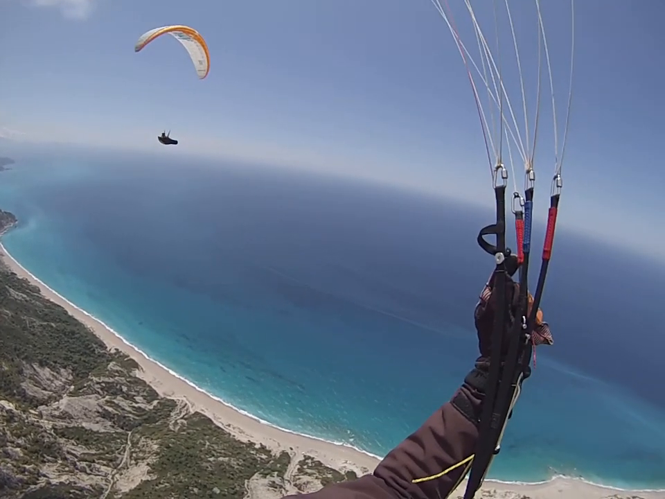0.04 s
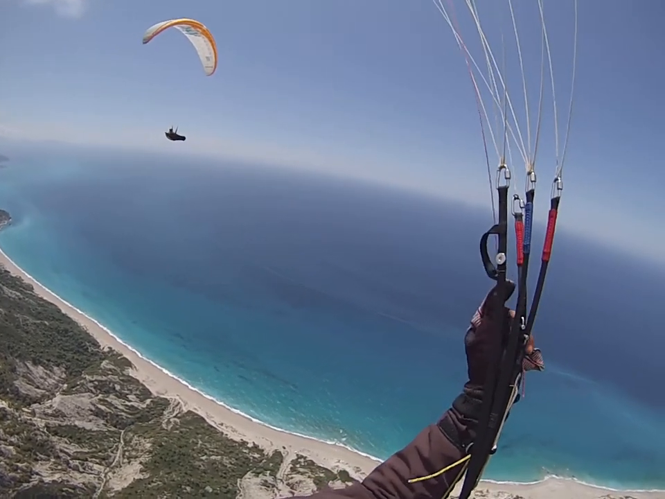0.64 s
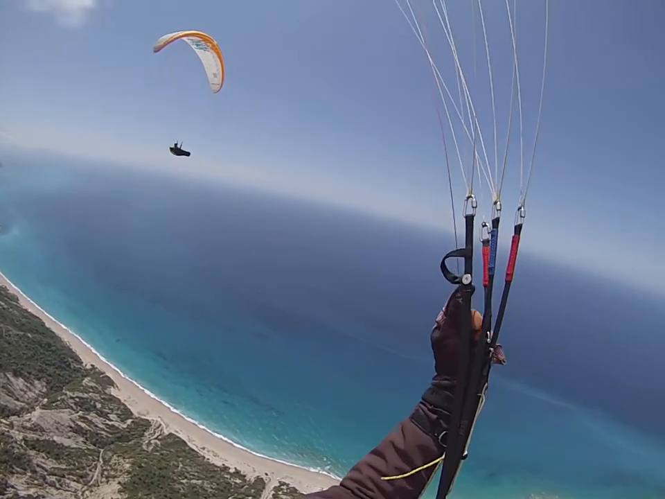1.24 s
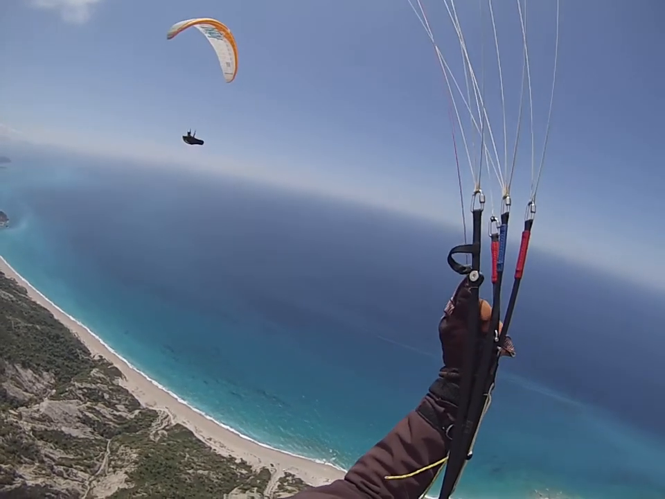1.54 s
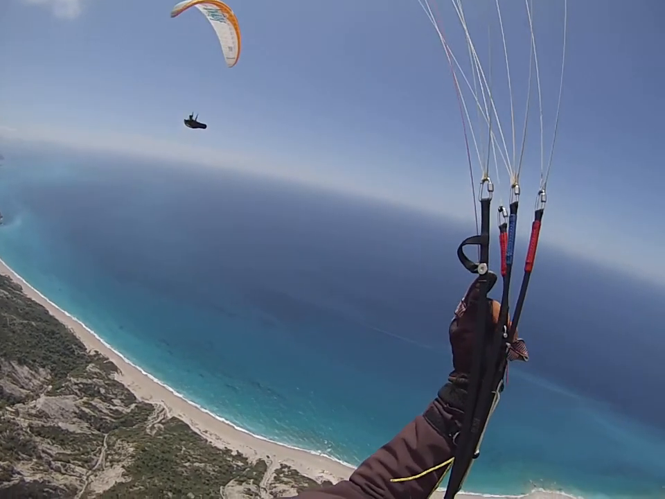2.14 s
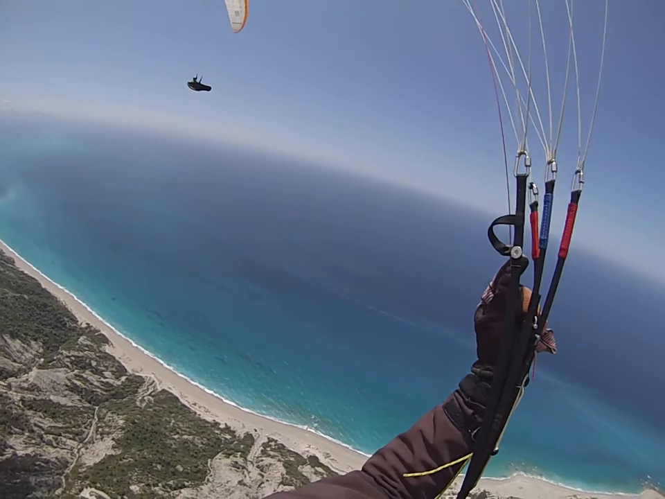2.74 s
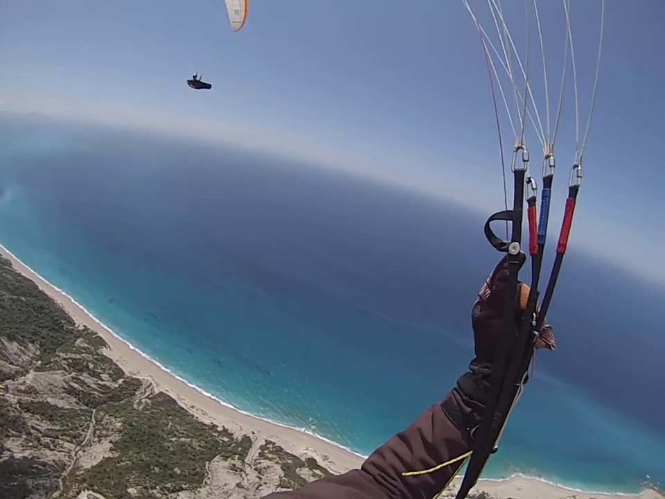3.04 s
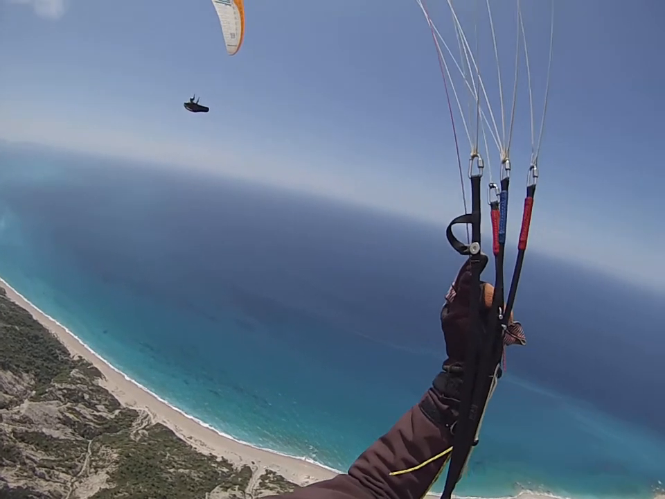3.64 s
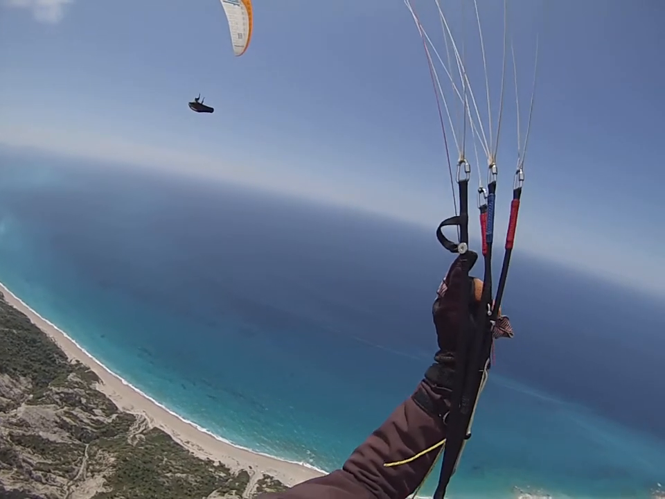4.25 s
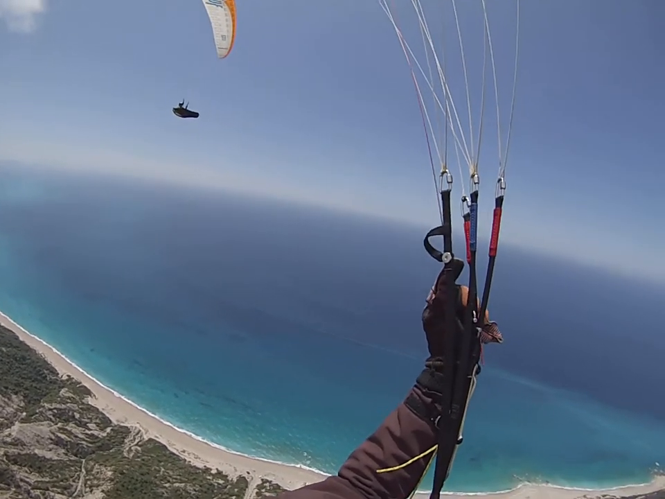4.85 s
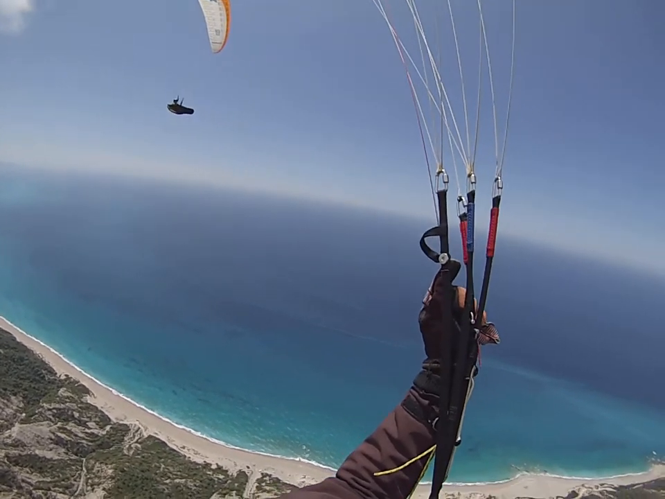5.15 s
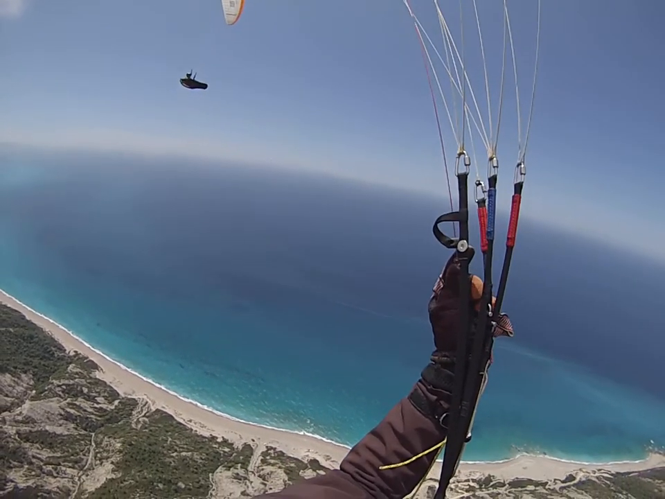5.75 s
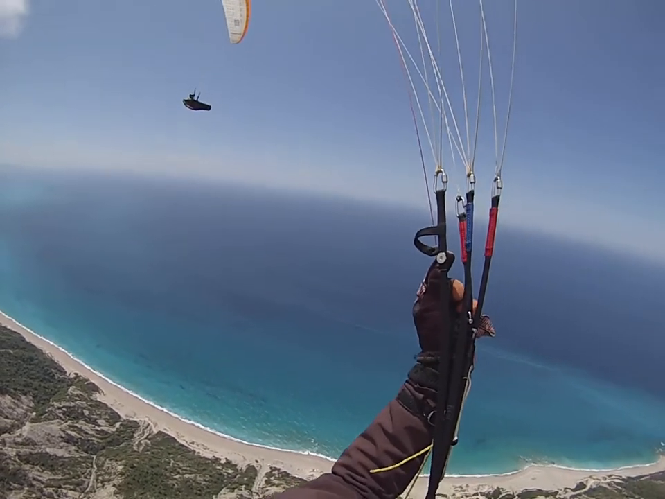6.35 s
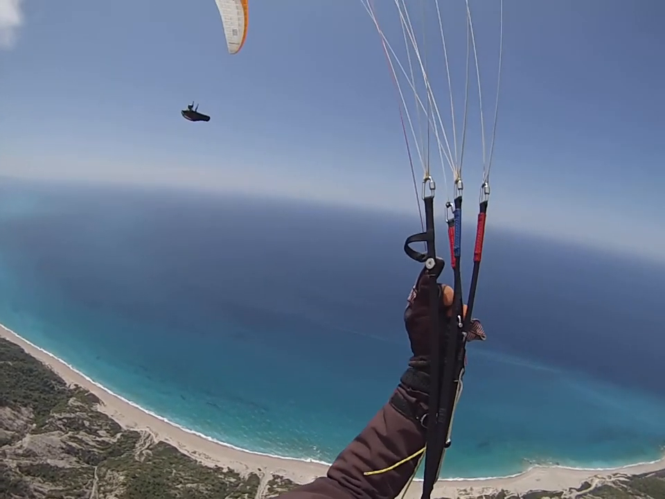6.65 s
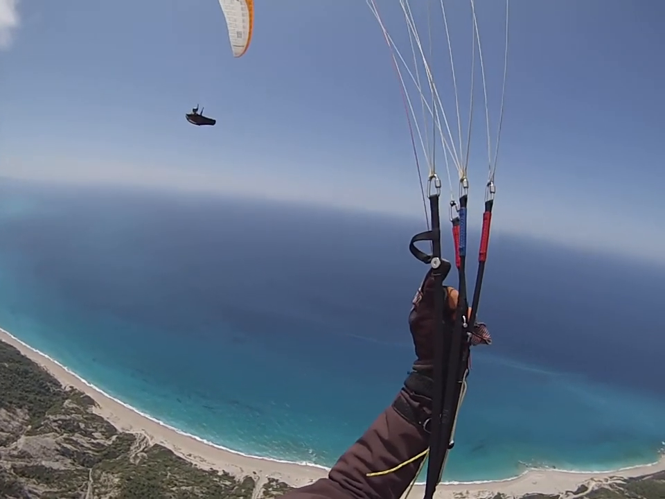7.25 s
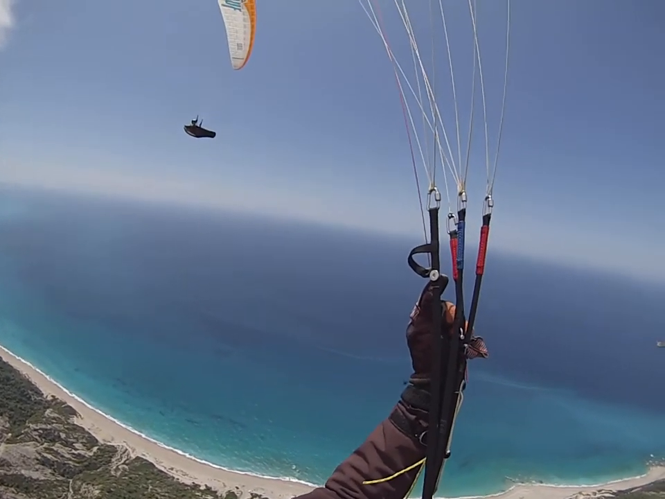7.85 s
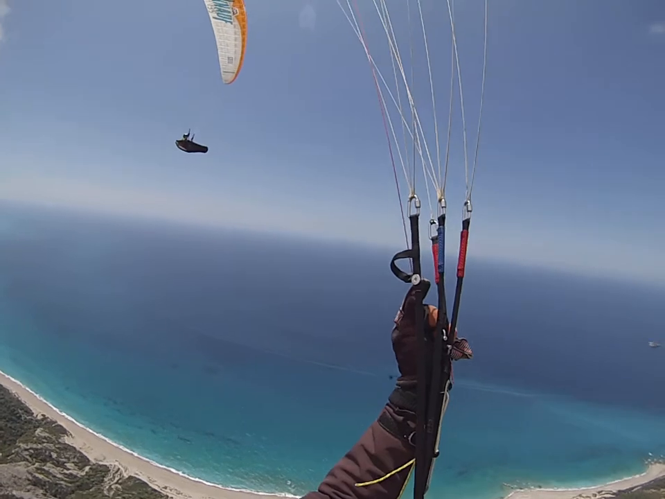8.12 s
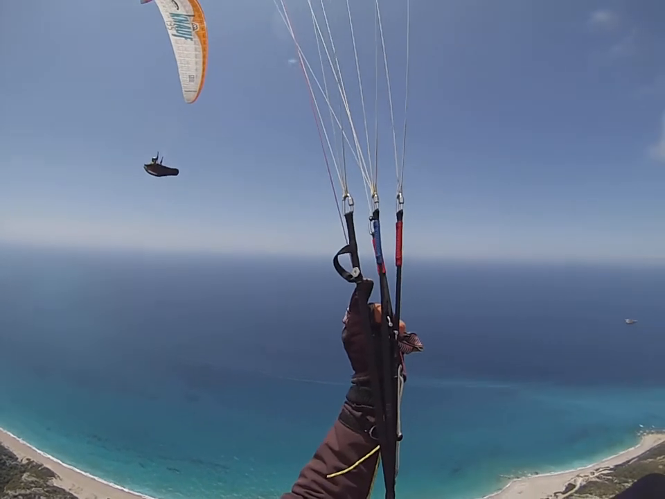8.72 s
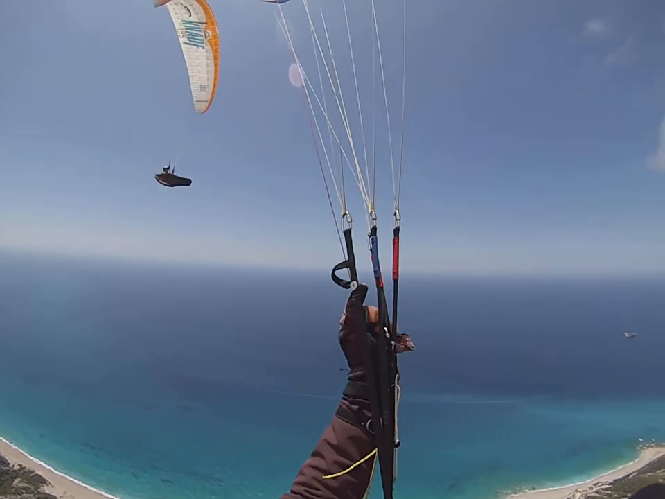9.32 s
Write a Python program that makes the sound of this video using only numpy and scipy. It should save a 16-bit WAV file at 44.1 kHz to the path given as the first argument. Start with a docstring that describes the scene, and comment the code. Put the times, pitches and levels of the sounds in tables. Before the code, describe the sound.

Strong wind streams past a small camera carried by a paraglider pilot high in open air. A deep, lumpy rumble and flutter buffet the microphone under a steady hiss and a faint breathy whistle from the lines. The first couple of seconds are the roughest, with roaring gusts, crackles and dull thumps. One small gear knock follows, then another hard gust near the middle, after which the wind eases somewhat but keeps blowing.

```python
"""High above the sea, air streams past a small camera carried by a paraglider pilot.
Eddies buffet the microphone port with a deep rumble and tear into a brighter roar in gusts.
The airflow hisses through the housing's cavities, whistles in the lines and swishes over fabric.
Single eddies slap and thump, the hardest gusts crackle, and the harness gear ticks and knocks."""
import sys
import numpy as np
from scipy import signal
from scipy.fft import rfft, irfft, next_fast_len
from scipy.io import wavfile
from scipy.ndimage import uniform_filter1d, minimum_filter1d, map_coordinates

SR = 44100
rng = np.random.default_rng(int(sys.argv[2]) if len(sys.argv) > 2 else 0)


def generate_wav(sig):
    """Save sig (samples, or channels by samples) to the path in sys.argv[1] as 16-bit PCM at SR."""
    pcm = np.round(np.clip(np.atleast_2d(sig).T, -1, 1) * 32767).astype(np.int16)
    wavfile.write(sys.argv[1], SR, pcm)


N = 413658


def amp(db):
    """Decibels to gain."""
    return 10 ** (np.asarray(db) / 20)


def unit(x):
    """x scaled to rms 1."""
    return x / np.sqrt(np.mean(x ** 2) + 1e-20)


def shape(points, hz):
    """Gain of an EQ curve: (freq_hz, level_db) points joined on a log axis."""
    point_hz, db = np.transpose(points)
    return amp(np.interp(np.log(hz + 1), np.log(point_hz + 1), db))


def curves(rows):
    """One automation curve for each column after time_s."""
    times, *columns = np.transpose(rows)
    return [np.interp(np.arange(N) / SR, times, column) for column in columns]


def swells(rows, squareness=2.54):
    """Sum of rounded (centre_s, width_s, height) swells; squareness above 2 flattens their tops."""
    t = np.arange(N) / SR
    out = np.zeros(N)
    for centre, width, height in rows:
        near = slice(*np.searchsorted(t, [centre - 4 * width, centre + 4 * width]))
        out[near] += height * np.exp(-np.abs((t[near] - centre) / width) ** squareness / 2)
    return out


def bursts(rows, attack_s):
    """Envelope of (start_s, level_db, t60_s) hits that rise fast and die away."""
    t = np.arange(SR // 10) / SR
    out = np.zeros(N + SR)
    for start, db, t60 in rows:
        out[round(start * SR):][:len(t)] += amp(db - 60 * t / t60) * (1 - np.exp(-t / attack_s))
    return out[:N]


def wobble(rate):
    """A smooth random curve, rate knots a second."""
    knots = rng.standard_normal(int(N * rate / SR) + 4)
    return map_coordinates(knots, [np.arange(N) * rate / SR])


def filtered(x, response):
    """x through a filter whose gain is response(hz)."""
    size = next_fast_len(N + SR // 2)
    return irfft(rfft(x, size) * response(np.fft.rfftfreq(size, 1 / SR)), size)[:N]


def muffled(x, edge_hz, order):
    """x with its treble rolled off above edge_hz."""
    return filtered(x, lambda hz: 1 / (1 + (hz / edge_hz) ** order))


def noise(response):
    """Coloured noise of rms 1."""
    return unit(filtered(rng.standard_normal(N), response))


def turbulence(spectrum, size):
    """Coloured noise levelled over size samples, so that an envelope sets its swells."""
    x = noise(lambda hz: shape(spectrum, hz))
    power = uniform_filter1d(uniform_filter1d(x ** 2, size), size)
    return x / np.sqrt(np.abs(power) + 1e-9)


def flow(hiss_lull_share=0.34):
    """Level rides in dB for roar, flutter, rumble and hiss: slow wind with gusts and lulls."""
    # turbulence between gusts: time_s, roar_db, flutter_db, rumble_db
    wind = [(0.0, -25.5, -19, -18.5), (0.42, -30, -22.5, -17.5), (1.17, -30.5, -21.5, -20),
            (1.36, -32.5, -22, -17), (2.24, -28.5, -22.5, -18), (2.45, -29.5, -24.5, -18),
            (2.87, -32, -23, -19), (3.21, -32.5, -24.5, -22), (4.31, -31, -23.5, -16.5),
            (5.04, -37.5, -31.5, -24.5), (5.43, -35, -29, -22), (7.5, -35, -28, -22.5),
            (7.68, -34.5, -25.5, -23.5), (8.28, -33, -27.5, -20), (9.38, -36, -35, -27.5)]
    # the smooth airstream: time_s, hiss_db
    airflow = [(0.0, -53.5), (0.44, -54), (0.55, -52), (1.75, -53.5), (1.96, -51.5), (4.41, -53.5),
               (5.14, -55.5), (5.49, -53.5), (5.59, -55), (6.65, -54.5), (7.05, -53), (7.45, -54),
               (7.63, -52.5), (7.73, -52.5), (8.41, -51), (9.12, -53.5), (9.38, -53.5)]
    # gusts that swell and fade evenly: centre_s, width_s, roar_lift_db, flutter_lift_db, hiss_lift_db
    gusts = [(0.0, .02, 4.5, 2, 2.5), (0.17, 0.046, 4, 0, 2.5), (0.459, 0.037, 10, 3.5, 2),
             (0.57, 0.018, 8.5, 3, 0), (0.652, 0.027, 11, 8, 0), (0.737, .015, 6.5, -0.5, 0),
             (0.95, 0.045, 6.5, 3.5, 1), (1.045, 0.02, 10.5, 4.5, -0.5), (1.14, 0.016, 4.5, -0.5, 0),
             (1.31, 0.055, 8.5, -0.5, 1), (1.44, 0.0095, 9, 2.5, 1.5), (1.571, .025, 8, 6.5, 0.5),
             (1.99, .02, 3.5, 5.5, 0), (2.33, 0.062, 1.5, 0.5, -0.5), (2.68, 0.042, 2, 5.5, 0.5),
             (3.041, .025, 0, 2, 2), (3.22, 0.019, 3, 5, 1), (3.66, .05, 4, 3.5, 0.5),
             (4.396, 0.045, 10, 6.5, 1), (4.55, .05, 4, 1.5, 1), (5.34, 0.03, 3.5, 5, 0.5),
             (5.45, 0.09, 0, 1, 1.5), (5.6, 0.036, 6, 2.5, -0.5), (6.345, 0.06, 4, 4, 3.5),
             (6.81, 0.041, 1.5, 2, 2.3), (7.65, 0.076, 2, 1, 2), (8.81, 0.01, 2.5, -0.5, 1),
             (9.1, 0.065, 2, 7.5, 3)]
    # brief swells and dips in the rumble alone: centre_s, width_s, change_db
    rumble_moves = [(0.55, .05, 2.5), (1.33, 0.025, 2.5), (1.6, .025, -8), (2.0, 0.048, 0.5),
                    (2.27, 0.038, 6.5), (2.76, 0.033, 3.5), (3.23, 0.014, 5.5), (3.45, 0.014, 8),
                    (4.12, 0.025, 2), (4.27, 0.019, -0.5), (4.49, 0.01, 4.5), (4.61, 0.018, 4.5),
                    (4.7, 0.015, 5.5), (5.25, 0.017, 6.5), (5.37, 0.022, 6), (5.65, 0.052, 5.5),
                    (6.03, 0.028, 3), (6.3, 0.022, 2.5), (6.55, 0.025, 6), (6.74, 0.025, 3.5),
                    (6.88, 0.016, 7), (7.18, 0.014, 7.5), (7.56, 0.027, 8.5), (7.82, 0.053, 4),
                    (8.12, 0.022, 2), (9.12, 0.013, 9.5), (9.2, .015, 9.5)]
    # brief lulls in the whole wind: centre_s, width_s, depth_db
    lulls = [(0.33, 0.065, 1), (0.8, 0.021, 3.5), (1.39, 0.017, 2), (2.5, 0.06, 2.5), (3.42, 0.034, 3),
             (5.16, 0.022, 1.5), (6.46, 0.045, 2.5), (6.65, .025, 3), (7.47, 0.032, 1.5), (8.93, 0.044, 1),
             (9.3, 0.046, 1)]
    roar_db, flutter_db, rumble_db = curves(wind)
    roar_lift, flutter_lift, hiss_lift = [swells(np.asarray(gusts)[:, [0, 1, c]]) for c in (2, 3, 4)]
    dip_db = swells(lulls)
    return (roar_db + roar_lift - dip_db,
            flutter_db + flutter_lift - dip_db,
            rumble_db + swells(rumble_moves) - dip_db,
            curves(airflow)[0] + hiss_lift - hiss_lull_share * dip_db)


def rumble(flow_db, level_db=1.0, lump_db=1.78, lump_rate=18):
    """Large slow eddies rumble on the port in uneven lumps."""
    # deep bass of the large eddies: freq_hz, level_db
    colour = [(8, -22), (22, -2.5), (38, 0), (65, -1.5), (100, -5), (135, -15.5), (220, -36.5), (500, -100)]
    return amp(flow_db + level_db + lump_db * wobble(lump_rate)) * turbulence(colour, size=3000)


def flutter(flow_db, eddies, level_db=2.5, eddy_db=2.0, lump_db=0.53, lump_rate=28):
    """Smaller, quicker eddies flutter above the rumble."""
    # upper bass of the small eddies: freq_hz, level_db
    colour = [(50, -37.5), (90, -4.5), (125, 1), (200, -2.5), (290, -9.5), (380, -16), (600, -35),
              (1500, -100)]
    envelope = amp(flow_db + level_db + eddy_db * eddies + lump_db * wobble(lump_rate))
    return envelope * turbulence(colour, size=2200)


def roar(flow_db, eddies, level_db=-1, eddy_depth=0.76, tear_depth=1.52, ragged_per_db=0.039):
    """Flow tears off the housing in quick irregular spurts, more ragged the harder it blows."""
    # midrange body of the tearing flow: freq_hz, level_db
    colour = [(150, -44.5), (280, -2.5), (380, 0.5), (520, -1.5), (700, -5), (930, -7), (1150, -14),
              (1450, -23), (2000, -33), (3000, -39), (5000, -54.5), (9000, -77)]
    ragged = 1 + ragged_per_db * (flow_db - flow_db.mean())
    spurts = unit(amp(ragged * (eddy_depth * eddies + tear_depth * wobble(260))))
    return amp(flow_db + level_db) * spurts * turbulence(colour, size=1200)


def housing(hz):
    """The housing's cavities lift narrow bands of the air that passes them."""
    # cavity resonances: centre_hz, width_hz, lift_db
    cavities = [(1900, 250, 2.5), (2540, 180, 2.5), (3220, 280, 5.5), (3950, 300, 5), (4230, 120, 2.5),
                (4600, 200, 1.5), (5660, 90, 7)]
    return amp(sum(db / (1 + (2 * (hz - centre) / width) ** 2) for centre, width, db in cavities))


def hiss(flow_db, eddies, level_db=4.0, eddy_db=.5, brighten=0.42):
    """The airstream hisses through the housing's cavities; faster flow lifts the treble most."""
    # the airstream ahead of the cavities: freq_hz, level_db
    colour = [(600, -25.5), (1100, 1.5), (1550, 1.5), (2100, 2.5), (2850, -3), (3650, -7), (4600, -7.5),
              (5150, -13.5), (6300, -15), (7200, -21), (9000, -32.5), (15000, -48)]
    air = noise(lambda hz: shape(colour, hz) * housing(hz))
    treble = filtered(air, lambda hz: hz ** 6 / (hz ** 6 + 2800 ** 6))
    tilt = amp(brighten * (flow_db - flow_db.mean()) / 2)
    return amp(flow_db + level_db + eddy_db * eddies) * (treble * tilt + (air - treble) / tilt)


def whistle(pitch_hz=1868, width_hz=90, drift_hz=7, level_db=-2, waver_db=1):
    """The taut lines shed vortices: a breathy whistle that swells and drifts a little in pitch."""
    # air whistling past the suspension lines: time_s, level_db
    ride = [(0.0, -51), (0.3, -55), (0.6, -51), (1.1, -51.5), (1.32, -47), (1.66, -55), (1.82, -48.5),
            (2.2, -51), (3.4, -50.5), (4.45, -50.5), (4.68, -56), (4.83, -47.5), (4.97, -57), (5.4, -52.5),
            (5.8, -54.5), (6.85, -52.5), (7.48, -56), (7.62, -49), (7.9, -54), (8.3, -51), (8.8, -49.5),
            (9.12, -50.5), (9.38, -54)]
    band = noise(lambda hz: 1 / (1 + ((hz - pitch_hz) / width_hz) ** 2))
    drift = np.exp(2j * np.pi * np.cumsum(drift_hz * wobble(3)) / SR)
    tone = np.real(signal.hilbert(band, next_fast_len(N))[:N] * drift)  # slides the whole band
    return amp(curves(ride)[0] + level_db + waver_db * wobble(9)) * tone


def sough(flow_db, centre_hz=3230, width_hz=150, level_db=-10.5, surge=2.5, waver_db=1):
    """A higher, broader note of the airstream that speaks mostly when the flow surges."""
    band = noise(lambda hz: 1 / (1 + ((hz - centre_hz) / width_hz) ** 2))
    steady_db = uniform_filter1d(flow_db, SR)
    return amp(steady_db + level_db + surge * (flow_db - steady_db) + waver_db * wobble(4.6)) * band


def noise_floor(level_db=-74.5):
    """A faint, steady high hiss lies under the wind."""
    # thin bed of treble: freq_hz, level_db
    colour = [(2000, -12.5), (8000, 2.5), (12500, -1), (14000, -7), (15200, -12.5)]
    return amp(level_db) * noise(lambda hz: shape(colour, hz))


def pops(grain_db=1.8):
    """The hardest gusts break at the port in short, grainy crackles that ring the housing."""
    # sharp pops of air at the port: start_s, level_db, t60_s
    hits = [(0.092, -39, .009), (0.1765, -34, .009), (0.2294, -34, .009), (0.435, -39, .08),
            (0.447, -39, .009), (0.5095, -32, .009), (0.562, -40, .05), (0.573, -36, .012),
            (0.626, -42, .08), (0.642, -37, .04), (0.647, -34, .012), (0.6502, -27.5, 0.022),
            (0.6572, -24.5, 0.008), (0.6645, -33, .009), (0.676, -35, .008), (0.6845, -37, .007),
            (0.728, -42, .03), (0.739, -36, .02), (0.754, -38, .009), (1.019, -39, .015),
            (1.031, -36.5, .035), (1.057, -39, .03), (4.3648, -37, .005), (4.3865, -36, .02),
            (4.3915, -32, 0.012), (4.3968, -29, .01), (4.4475, -39, .006)]
    # bright crackle: freq_hz, level_db
    colour = [(200, -15), (700, 6), (1400, 4), (2300, 5), (3200, 7), (4000, -1.5), (4700, -7.5),
              (5700, -6), (8000, -16), (11000, -36), (15000, -54)]
    grains = unit(amp(grain_db * wobble(440)))
    return bursts(hits, attack_s=.0004) * grains * turbulence(colour, size=100)


def flaps(flow_db, level_db=2, slap_t60_s=0.019, puff_t60_s=.03, stray_count=4, stray_db=-1):
    """Eddies hit the housing with a dull slap and a breathy puff; stray slaps follow the wind's level."""
    # eddies breaking on the housing: start_s, level_db, puff_over_slap_db
    hits = [(0.095, -17, -24), (0.229, -15.5, -15), (0.609, -14.5, -16), (0.643, -13, -18),
            (0.650, -12.5, -18), (0.664, -14.5, -17), (0.871, -18, -23), (0.952, -19, -11),
            (1.030, -15.5, -12), (1.059, -19.5, -11), (1.131, -17.5, -24), (1.421, -18, -24),
            (1.525, -18, -18), (1.547, -16.5, -19), (1.560, -24, -10), (1.5695, -13, -12),
            (1.580, -19.5, -14), (1.901, -19, -24), (1.992, -21.5, -22), (2.264, -20, -16),
            (2.301, -16, -23), (2.798, -19, -24), (3.158, -19, -23), (3.913, -16.5, -22),
            (4.150, -16.5, -28), (4.326, -20, -22), (4.390, -13, -30), (4.396, -12, -30), (4.412, -16, -26),
            (4.427, -17, -26), (4.494, -23, -22), (5.582, -22.5, -22), (5.628, -20, -22), (6.051, -23, -21),
            (6.271, -24, -21), (8.360, -23, -23), (8.488, -22.5, -24)]
    # slap and puff: freq_hz, level_db
    slap_colour = [(150, -30), (350, 0), (550, 7.5), (950, 3), (1200, -8), (1600, -28), (3000, -44),
                   (6000, -73)]
    puff_colour = [(600, -25), (1100, -2), (1550, 0), (2000, -6), (2700, -17), (4000, -30), (8000, -60)]
    strays = [(when * N / SR, stray_db + flow_db[int(when * N)] + 5 * strength, slap_t60_s)
              for when, strength in rng.random((stray_count, 2))]
    slap_hits = [(start, db, slap_t60_s) for start, db, _ in hits] + strays
    puff_hits = [(start, db + puff_db, puff_t60_s) for start, db, puff_db in hits]
    slaps = bursts(slap_hits, attack_s=0.00079) * turbulence(slap_colour, size=150)
    puffs = bursts(puff_hits, attack_s=0.0017) * turbulence(puff_colour, size=150)
    return amp(level_db) * (muffled(slaps, edge_hz=1250, order=12) + muffled(puffs, edge_hz=3000, order=6))


def clicks(t60_s=0.0052, level_db=-2):
    """Short bright clicks: two very high ticks and one sharp pop of air."""
    # snaps of band noise: start_s, level_db, pitch_hz, width_hz
    hits = [(0.260, -47, 10700, 900), (3.159, -41, 4500, 2300), (3.7468, -43, 10900, 1400)]
    out = np.zeros(N)
    for start, db, pitch_hz, width_hz in hits:
        band = noise(lambda hz: np.exp(-((hz - pitch_hz) / width_hz) ** 2 / 2))
        out += bursts([(start, db + level_db, t60_s)], attack_s=0.00034) * band
    return out


def thumps(level_db=-3):
    """A big eddy sucks at the port, then pushes: one soft swing of pressure."""
    # single big eddies: centre_s, level_db, half_swing_s
    hits = [(0.65, 1.5, 0.0028), (0.668, -14, 0.0012), (1.065, -7, 0.0043), (1.579, -1, 0.0014),
            (2.259, -9, 0.0059), (3.225, -1.5, 0.002), (4.119, -12, 0.0054), (4.398, -7, 0.0011),
            (5.661, -6.5, 0.0047), (7.163, -19, 0.003), (8.823, -8.5, 0.0013), (9.108, -15, 0.0034),
            (9.204, -7.5, 0.0051)]
    t = np.arange(N) / SR
    out = np.zeros(N)
    for centre, db, half_swing in hits:
        near = np.abs(t - centre) < 10 * half_swing
        swing = (t[near] - centre) / half_swing
        out[near] += amp(db + level_db) * swing * np.exp((1 - swing ** 2) / 2)
    return out


def knock(attack_s=0.0018):
    """A piece of gear bumps once and rings briefly in one hollow mode."""
    # bump of harness gear: start_s, level_db, pitch_hz, t60_s
    hits = [(2.688, -6, 860, 0.017)]
    t = np.arange(N) / SR
    return sum(bursts([(start, db, t60)], attack_s) * np.sin(2 * np.pi * pitch_hz * (t - start))
               for start, db, pitch_hz, t60 in hits)


def swishes(rustle_db=1.2, rustle_rate=120):
    """Air sweeps over fabric with a soft, slightly rustling swish."""
    # gusts brushing the sleeve and harness: centre_s, width_s, level_db
    sweeps = [(5.42, .09, -65.5), (6.345, .05, -64), (6.81, .055, -65), (7.66, .055, -63), (9.09, .06, -63)]
    # airy sheen of the cloth: freq_hz, level_db
    colour = [(1200, -20), (2000, 0), (3000, 3), (4200, -3), (5800, -1), (7000, -6), (8600, -14),
              (10000, -18), (12000, -18), (14000, -30)]
    envelope = swells([(centre, width, amp(db)) for centre, width, db in sweeps])
    return envelope * amp(rustle_db * wobble(rustle_rate)) * noise(lambda hz: shape(colour, hz))


def scene():
    """Open air without echoes, in mono: the same gusts and eddies shake flutter, roar and hiss."""
    eddies = wobble(90)
    roar_db, flutter_db, rumble_db, hiss_db = flow()
    low_end = rumble(rumble_db) + flutter(flutter_db, eddies)
    rush = roar(roar_db, eddies) + hiss(hiss_db, eddies)
    bed = noise_floor()
    bumps = flaps(roar_db) + pops() + thumps() + knock() + clicks()
    return (low_end + rush + bumps + swishes() + whistle() + sough(hiss_db) + bed)[None]


def record(dry, ceiling=0.8, hold_s=.004, top_hz=15400):
    """A fast limiter holds down the hardest buffets; the camera keeps nothing above its band limit."""
    hold = int(hold_s * SR)
    needed_gain = ceiling / np.maximum(np.abs(dry[0]), ceiling)
    held_gain = minimum_filter1d(needed_gain, 2 * hold)
    smooth_gain = uniform_filter1d(uniform_filter1d(held_gain, hold), hold)
    return filtered(dry[0] * smooth_gain, lambda hz: hz < top_hz)[None]


dry = scene()
out = record(dry)
generate_wav(out)
```